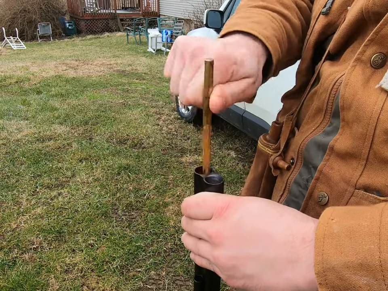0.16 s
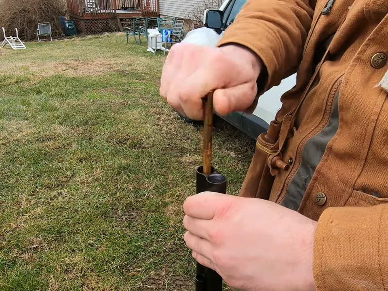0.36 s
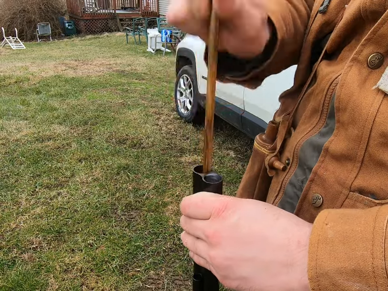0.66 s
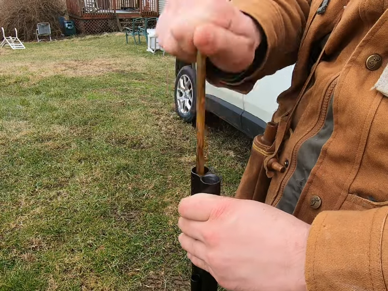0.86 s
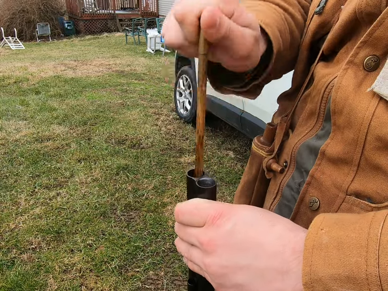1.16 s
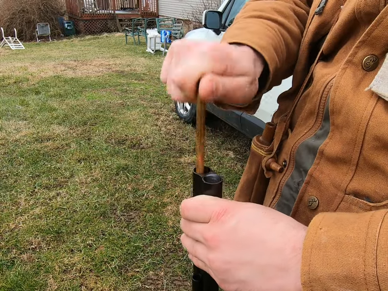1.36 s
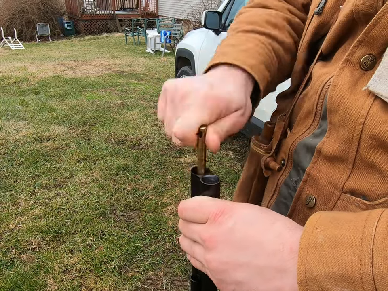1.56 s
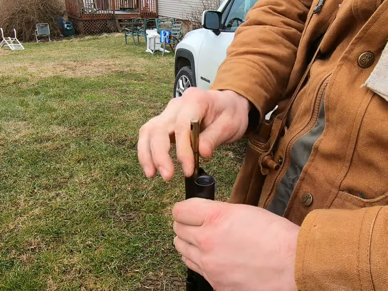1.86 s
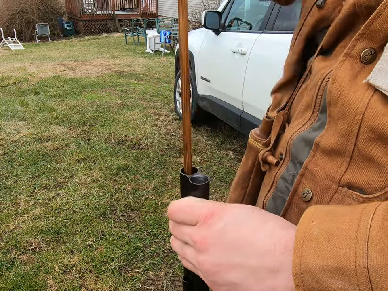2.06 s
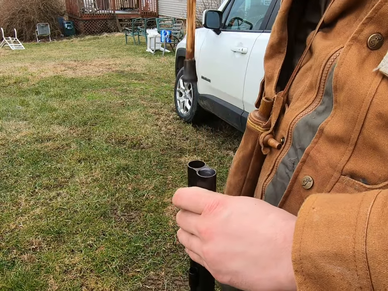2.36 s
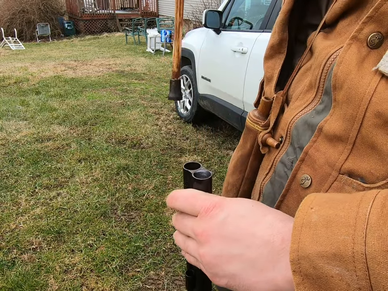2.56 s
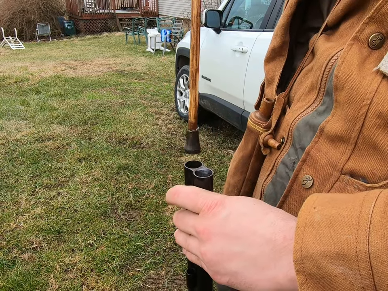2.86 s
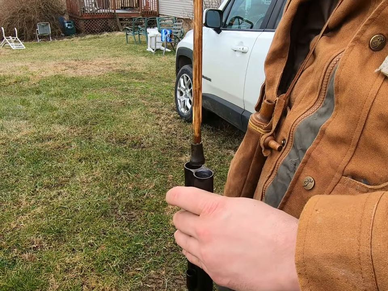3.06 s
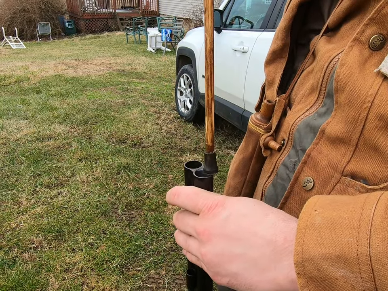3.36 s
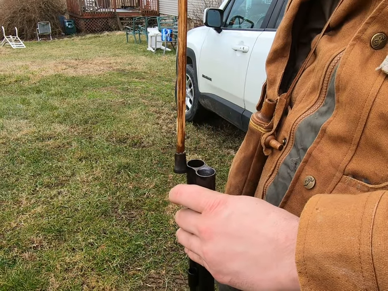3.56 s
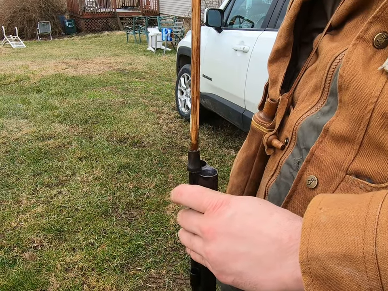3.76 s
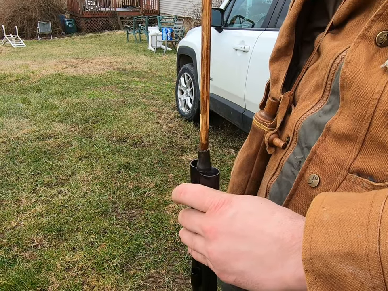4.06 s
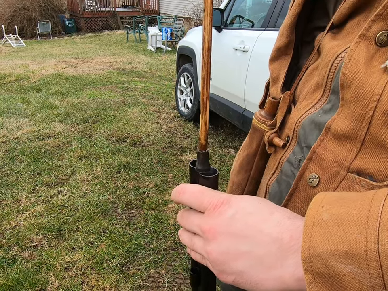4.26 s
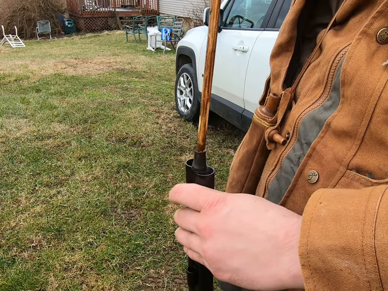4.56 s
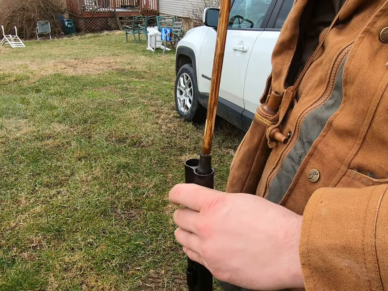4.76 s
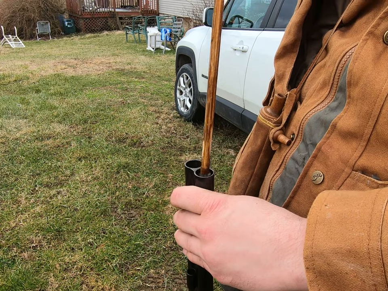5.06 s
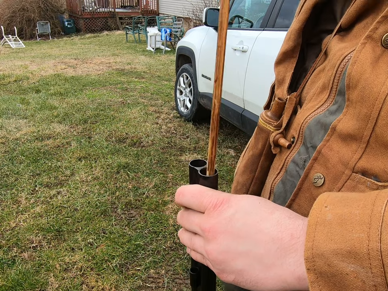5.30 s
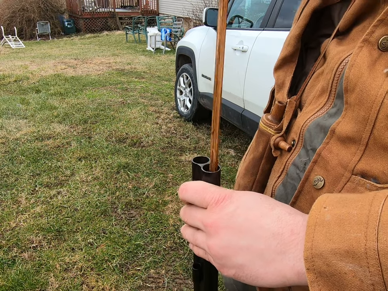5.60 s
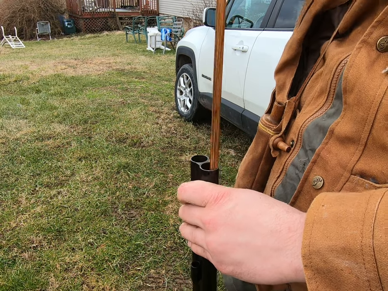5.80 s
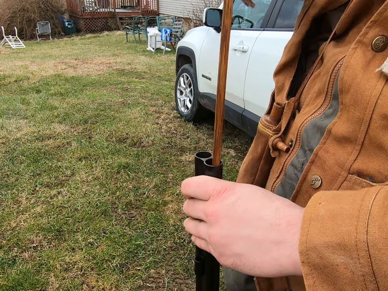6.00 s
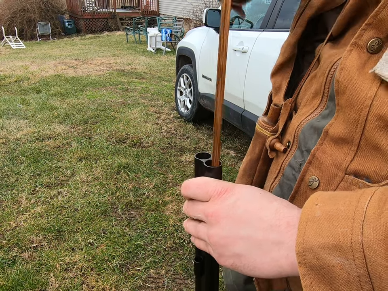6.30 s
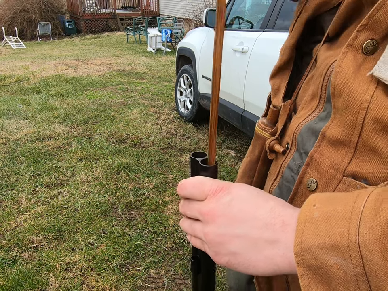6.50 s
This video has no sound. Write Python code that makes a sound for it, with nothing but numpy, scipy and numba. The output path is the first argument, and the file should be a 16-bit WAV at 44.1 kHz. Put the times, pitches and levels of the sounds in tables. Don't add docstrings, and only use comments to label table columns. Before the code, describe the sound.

Metal-tipped wooden rod cracks and clinks inside a steel gun barrel, is scraped out, taps the muzzle, then rasps up and down the second barrel.

```python
import sys
import numpy as np
from scipy import signal
from scipy.fft import rfft, irfft
from scipy.io import wavfile
from scipy.ndimage import uniform_filter1d
from numba import njit

SR = 44100
rng = np.random.default_rng(int(sys.argv[2]) if len(sys.argv) > 2 else 0)


def generate_wav(sig):
    pcm = np.round(np.clip(np.atleast_2d(sig).T, -1, 1) * 32767).astype(np.int16)
    wavfile.write(sys.argv[1], SR, pcm)


def field_ratio(decibels):
    return 10 ** (np.asarray(decibels, dtype=float) / 20)


N = 292824

# time in s, pipe pitch in Hz, scrape of the next stroke in dB, attack in s.
STROKES = [(5.469, 1382, -32.5, 0.014), (5.625, 371.5, -26, .005), (5.748, 772.4, -35, 0.011),
           (5.889, 270.9, -30, 0.035), (6.037, 469.5, -37.5, 0.015), (6.169, 237, -29, 0.02),
           (6.301, 570, -35.5, 0.025), (6.445, 217.2, -28.5, 0.03), (6.534, 372, -32, 0.00005),
           (6.581, 357.4, -31, 0.0155), (6.66, 373.5, -60, 0)]
# start in s, crack in dB, air push in dB,
# push length in ms, brittle treble in dB re crack.
RAMS = [(0.001, -26.5, -29.5, 4.76, -14.5), (0.093, -11, -18.5, 4.95, -24.5), (0.204, -28, -19, 4.95, -17),
        (0.386, -17, -37.5, 5.5, -22), (0.844, 5.5, -15, 2.3, -27), (0.8602, -20, -11.5, 4.36, -25),
        (0.922, -31, -26, 2.96, -17), (1.109, -2, -14, 5.1, -18.5), (1.188, -18, -28.5, 4.8, -10),
        (1.374, 7, -16, 5.2, -29.5), (1.447, -10.5, -31, 4.4, -20), (1.618, 1, -19.5, 2.7, -23.5),
        (5.523, -4.5, -50, 5.7, -17.5), (6.317, -8.5, -22, 3.17, -29), (6.515, -3, -61, 9.2, -18),
        (6.613, -2.5, -16.5, 4.66, -21)]
# start in s, peak in dB, tone in Hz.
SNAGS = [(5.191, -28, 5700), (5.207, -25, 4040), (5.214, -21, 3920), (5.22, -21, 3660),
         (5.225, -21.5, 3530), (5.273, -28, 3500), (5.631, -22, 2690), (5.6535, -2, 3020),
         (5.6595, -16, 3200), (5.673, -10.5, 3340), (5.686, -5, 3650), (5.6945, -8, 2600),
         (5.702, -18, 5400), (5.7059, -13.5, 2280), (5.761, -21, 3070), (5.767, -10, 3480),
         (5.794, -22, 4000), (5.806, -18, 3120), (5.826, -23, 3200), (5.843, -14.5, 2440),
         (5.918, -40, 3020), (5.929, -21, 2870), (5.957, -43, 2310), (5.969, -3.5, 2970),
         (5.986, -24, 2130), (6, -17.5, 2480), (6.083, -18, 2530), (6.205, -29, 3500), (6.231, -8, 2740),
         (6.238, -12, 2130), (6.243, -13.5, 2930), (6.268, -13, 3600), (6.315, -18.5, 2530),
         (6.477, -20, 3440), (6.488, -20, 3020), (6.506, -21.5, 3060)]
# time in s, level in dB.
DRAW = [
    (2.09, -52),
    (2.16, -52.5),
    (2.27, -40),
    (2.325, -41),
    (2.345, -59),
    (2.37, -50),
    (2.48, -58.5),
    (2.56, -83),
]
# peak time in s, level in dB, rise in dB per s, fall in dB per s.
RUSTLE = [(.015, -46.5, 98, 167), (.2, -59, 57, 48), (.085, -47.5, 247, 910), (.75, -58.5, 130, 30),
          (.84, -42.5, 348.5, 899.5), (1.104, -50, 102, 900), (1.33, -59.5, 150, 147),
          (1.371, -55, 499.5, 900), (.9, -46.5, 196, 44), (1.45, -61.5, 99.5, 35), (2.04, -66, 27, 900),
          (2.5, -71, 899.5, 23), (3.8, -87, 4, 13), (4.7, -76.5, 28.5, 16.5), (4.99, -55.5, 88, 698)]
# tone in Hz, level in dB, t60 in s.
STEEL = [(808, -8, 0.1413), (998, -2.5, 0.14), (1282, -3, 0.2), (1451, -2.5, 0.038), (2120, 7, 0.042),
         (2970, 0.5, 0.03), (3160, -10, 0.1), (3310, 2, 0.03), (4076, 7, 0.035), (5030, -17, 0.063),
         (5850, -13.5, 0.06), (5740, -0.5, 0.029), (6300, -26, 0.053), (6600, -13, 0.067),
         (7800, -5, 0.063), (7960, -17, 0.055)]


def amp_curve(table):
    s, db = np.transpose(table)
    return field_ratio(np.interp(np.arange(N) / SR, s, db, left=-200, right=-200))


def swells(rows, floor_db=-200):
    t = np.arange(N) / SR
    power = field_ratio(floor_db) ** 2
    for s, db, rise, fall in rows:
        power = power + field_ratio(db - np.maximum(rise * (s - t), fall * (t - s))) ** 2
    return np.sqrt(power)


def unit(x):
    return x / np.sqrt(np.mean(x ** 2))


def band(x, lo_hz, hi_hz):
    edges_hz = [lo_hz, min(hi_hz, .45 * SR)]
    return signal.sosfilt(signal.butter(2, edges_hz, "bandpass", fs=SR, output="sos"), x)


def colour(x, spectrum):
    hz, db = np.transpose(spectrum)
    size = 8192
    bin_hz = np.fft.rfftfreq(size, 1 / SR)
    cep = irfft(np.log(field_ratio(np.interp(np.log(bin_hz + 1), np.log(hz), db))))
    cep[1:size // 2] *= 2
    cep[size // 2 + 1:] = 0
    return signal.fftconvolve(x, irfft(np.exp(rfft(cep))))[:len(x)]


def flicker(rate_hz, depth_db):
    k = int(SR / rate_hz)
    steps = np.repeat(rng.standard_normal(N // k + 1), k)
    return field_ratio(depth_db * unit(uniform_filter1d(steps, k)[:N]))


def ring_down(t, t60):
    return np.exp(-np.log(1000) * t / t60)


def add(track, s, sound):
    i = int(s * SR)
    track[i:i + len(sound)] += sound[:N - i]


def rams():
    # frequency in Hz, level in dB per Hz.
    crack_spectrum = [(290, -42), (500, -1.5), (807, 4.5), (1820, 4.5), (4150, 3.5), (4870, -2),
                      (7210, -15.5), (12100, -35.5), (16000, -58.5)]
    cracks, brittle, pushes = np.zeros((3, N))
    t = np.arange(600) / SR
    for s, crack_db, push_db, push_ms, brittle_db in RAMS:
        splinter = rng.standard_normal((2, 600)) * np.exp(-t / 0.0014)
        add(cracks, s + .001, field_ratio(crack_db) * (.25 * splinter[0] + (t == 0)))
        add(brittle, s + .001, field_ratio(crack_db + brittle_db) * splinter[1])
        add(pushes, s, -field_ratio(push_db) * np.sin(np.pi * np.minimum(t * 1000 / push_ms, 1)) ** 2)
    cracks = field_ratio(-2) * band(colour(cracks, crack_spectrum), 230, 6800)
    brittle = field_ratio(5.5) * band(band(brittle, 5000, 9000), 4000, 11000)
    return cracks + brittle + band(pushes, 88, 5000)


@njit
def pipe(x, lag, gain, damp, treble):
    y, soft = np.zeros(len(x)), 0.
    for i in range(len(x)):
        at = i - lag[i]
        j = int(np.floor(at))
        back = y[j] + (at - j) * (y[j + 1] - y[j]) if j >= 0 else 0.
        soft += damp[i] * (back - soft)
        y[i] = x[i] - gain[i] * (treble[i] * back + (1 - treble[i]) * soft)
    return y


def bore(x):
    # start in s, pipe pitch in Hz, sag in Hz per s.
    seated = [
        (0, 125.4, 87),
        (.09, 137.3, 122),
        (.2, 127, 107),
        (.38, 133.4, 33.5),
        (.84, 127.9, 21),
        (1.1, 128.1, -7.5),
        (1.372, 128.9, 48),
        (1.617, 127.2, -10.5),
    ]
    # time in s, pipe pitch in Hz.
    travel = [
        (2.05, 131),
        (2.201, 187),
        (2.301, 460),
        (2.362, 1570),
        (5.168, 4884),
        (5.222, 3080),
        (5.251, 1690),
        (5.28, 860),
        (5.32, 760),
    ]
    loss_db, damp_hz = np.array([-1, -0.65]), np.array([1100, 2090])
    treble_share = np.array((0.34, 0.6))
    t = np.arange(N) / SR

    row = np.searchsorted(np.transpose(seated)[0], t, side="right") - 1
    s, hz, sag = np.transpose(seated)[:, row]
    seated_s = 1 / (hz - sag * np.minimum(t - s, .5))

    travel_at, travel_hz = np.transpose(travel)
    travel_s = np.interp(t, travel_at, 1 / travel_hz)

    turns, turn_hz = np.transpose(STROKES)[:2]
    count = np.arange(len(turns))
    stroke = np.interp(t, turns, count)
    eased = np.floor(stroke) + np.sin(np.pi / 2 * (stroke % 1)) ** 2
    swung_s = np.interp(eased, count, 1 / turn_hz)

    moving_s = np.where(t < turns[0], travel_s, np.maximum(travel_s, swung_s))
    period_s = np.where(t < travel_at[0], seated_s, moving_s)
    barrel = (t > 4).astype(int)
    damp = 1 - np.exp(-2 * np.pi * damp_hz[barrel] / SR)
    treble = treble_share[barrel]
    trip = uniform_filter1d(SR / 2 * period_s, size=300)
    lag = np.maximum(trip - (1 - treble) * (1 - damp) / damp, 2.)
    return pipe(x + 1e-18, lag, field_ratio(loss_db)[barrel], damp, treble)


def clicks():
    # start in s, peak in dB, tone in Hz.
    blows = [(.092, -13, 2010), (0.0944, -9.5, 3560), (.386, -14.5, 3860), (.8445, -4, 3560),
             (0.858, -20, 2500), (.8583, -15.5, 1660), (1.1084, -10.5, 2840), (1.1099, -2.5, 2740),
             (1.3735, -8.5, 2440), (1.376, -8, 3460), (1.619, -15, 1850), (1.619, -7, 3630),
             (1.619, -7, 6400), (1.6204, -10, 6230), (5.523, -3.5, 2700), (6.519, -10, 1340),
             (6.614, -7.5, 1930), (0.924, -33.5, 900)]
    cycles = 2.13
    out, t = np.zeros(N), np.arange(600) / SR
    for s, peak_db, hz in blows + SNAGS:
        window = np.sin(np.pi * np.minimum(t * hz / cycles, 1)) ** 2
        add(out, s, field_ratio(peak_db + 0.5) * window * np.sin(2 * np.pi * hz * t))
    return out


def stroking():
    turn_db, snag_swell_db, snag_swell_s = -55.5, 5.5, 0.023
    rows, t = [], np.arange(N) / SR
    for (start, hz, db, attack_s), (end, next_hz, *_) in zip(STROKES, STROKES[1:]):
        release_s, swell_db = (0.037, -4.5) if next_hz < hz else (0.028, 2.9)
        room = min(1, .9 * (end - start) / (attack_s + release_s))
        rows += [(start, turn_db),
                 (start + room * attack_s, db - swell_db / 2),
                 (end - room * release_s, db + swell_db / 2),
                 (end - 1 / SR, turn_db)]
    flare = sum((t > s) * np.exp(-np.abs(t - s) / snag_swell_s) for s, *_ in SNAGS)
    return amp_curve(rows) * field_ratio(snag_swell_db * (np.minimum(flare, 1) - .5))


def rubbing():
    # time in s, level in dB.
    entry = [
        (5.13, -85),
        (5.18, -36.5),
        (5.215, -32.5),
        (5.24, -37.5),
        (5.272, -36),
        (5.335, -69.5),
        (5.355, -69.5),
        (5.46, -69),
    ]
    # frequency in Hz, level in dB per Hz.
    grit_spectrum = [(400, -25.5), (800, -22), (1200, -6.5), (1800, -5), (3300, -0.5), (5000, -4),
                     (7500, -7.5), (8500, -25), (14000, -57.5)]
    # time in s, tone in Hz.
    rim_pitch = [
        (5.16, 4700),
        (5.2, 4300),
        (5.225, 3500),
        (5.245, 3300),
        (5.25, 4600),
        (5.275, 3500),
        (5.33, 2600),
    ]
    entry_gain = amp_curve(entry)
    force = np.maximum(amp_curve(DRAW) + entry_gain, stroking())
    t = np.arange(N) / SR
    roughness = np.where(t > 3, 1, np.where(t > DRAW[5][0], .3, 1.5))
    grains = (flicker(900, 3) * flicker(120, 2.5)) ** roughness

    def grainy():
        return rng.standard_normal(N) * grains

    grit_out, grit_in = [unit(colour(grainy(), grit_spectrum)) * force for _ in range(2)]
    hiss = unit(band(grainy(), 4500, 9840)) * force ** 0.6 * field_ratio(-28)
    drumming = unit(band(grainy(), 390, 1740)) * force * (t < 3) * field_ratio(-13)

    nap = flicker(300, 3) * flicker(40, 4)
    cloth = np.zeros(N)
    for hz, share in ((1100, 0.26), (2100, 0.42), (3300, 0.63), (5500, 0.32)):
        strip = band(band(rng.standard_normal(N) * nap, hz / 1.3, hz * 1.3), hz / 2, hz * 2)
        cloth += share * unit(strip) * flicker(30, 3.6)
    cloth *= swells(RUSTLE)

    squeal = np.sin(2 * np.pi * np.cumsum(np.interp(t, *np.transpose(rim_pitch))) / SR)
    squeal *= unit(band(grainy(), 52, 420))
    rim = band(grit_out, 3100, 5050) * field_ratio(-5) + squeal * entry_gain * field_ratio(7)
    return rim + grit_out * field_ratio(-11) + hiss + drumming + cloth, grit_in * field_ratio(-3)


def hum():
    return unit(band(rng.standard_normal(N), 130, 616)) * stroking() ** 0.47 * field_ratio(-39.5)


def knock(wood_hz, tick_db, steel_db, modes):
    t = np.arange(5000) / SR
    chance = rng.standard_normal((2, len(modes), 1))
    hz, db, t60 = np.transpose(modes)[:, :, None]
    gain = field_ratio(.5 * db + 2.5 * chance[0] - 8 * np.abs(np.log2(hz / wood_hz)))
    decay = ring_down(t, np.minimum(t60, 0.079 * np.sqrt(1500 / hz)))
    tones = gain * decay * np.sin(2 * np.pi * hz * (1 + 0.0038 * chance[1]) * t)
    spot = .8 * gain.max() * ring_down(t, 0.019) * np.sin(2 * np.pi * wood_hz * t)
    tones = (tones.sum(axis=0) + spot) * (1 - np.exp(-t / 0.00021))

    rattle = rng.standard_normal((2, 5000)) * (1 - np.exp(-t / 0.0027))
    wood = rattle[0] * (np.exp(-t / 0.0026) + 0.05 * np.exp(-t / 0.011))
    wood = band(band(wood, wood_hz / 2.41, wood_hz * 2.2), wood_hz / 12, wood_hz * 1.7)
    tick = band(rattle[1] * (np.exp(-t / 0.0054) + .05 * np.exp(-t / .012)), 4600, 10000)
    parts = (wood, -6.5), (tick, tick_db + 3), (tones, steel_db)
    return sum(field_ratio(part_db) * part / np.abs(part).max() for part, part_db in parts)


def knocks():
    # start in s, peak in dB, wood (or fitting) tone in Hz.
    lifts = [(.123, -35, 965), (.253, -33.5, 3250), (.278, -44, 2070), (.327, -51, 3030),
             (.373, -28.5, 3620), (.533, -39, 3730), (.543, -39, 1160), (.671, -39, 3250),
             (.708, -41.5, 2580), (.728, -26, 3010), (1.037, -16, 4414), (1.046, -24, 3816),
             (1.054, -23, 5560), (1.129, -34.5, 2296), (1.284, -23, 3480)]
    rattles = [(.175, -23, 2000), (.195, -36, 1590), (.228, -56, 850), (.395, -28.5, 3320),
               (.422, -34.5, 3800), (.874, -20, 2840), (.885, -18, 4200), (.936, -26.5, 3180),
               (.993, -37.5, 4060), (1.156, -25, 3800), (1.187, -20, 3150), (1.248, -34, 2550),
               (1.289, -33, 2180), (1.378, -23, 1770), (1.407, -21, 3500), (1.445, -25.5, 2800),
               (1.483, -31.5, 3080), (1.525, -22, 4964), (1.47, -38.5, 2500), (1.195, -26.5, 2215),
               (1.08, -33.5, 3400), (1.327, -47, 2450), (.052, -51, 2030), (.825, -29, 3330),
               (1.645, -27, 2952), (5.631, -21, 3000), (6.334, -18, 3252), (6.355, -18, 2720),
               (6.549, -21.5, 3030), (6.597, -36, 2150)]
    grips = [(1.697, -38, 7800), (1.72, -43.5, 2140), (1.787, -29.5, 3560), (1.83, -39, 3500),
             (1.856, -42, 3560), (1.904, -33, 2660), (1.946, -30, 2560), (2.008, -39, 2830),
             (2.055, -37.5, 3130), (2.066, -34.5, 2560), (2.087, -19.5, 3480), (2.119, -41, 2930),
             (2.199, -34, 4000), (2.219, -29, 4260), (2.254, -30, 3200), (2.325, -52, 3400),
             (2.279, -23, 5400), (2.355, -22, 2670)]
    taps = [
        (3.671, -19.5, 2120),
        (3.85, -37, 2080),
        (4.803, -33, 1650),
        (4.919, -24, 2130),
        (4.949, -45, 1090),
    ]
    nudges = [
        (3.378, -33, 2820),
        (3.97, -46, 2658),
        (4.061, -55, 3440),
        (4.785, -39.5, 2377),
        (4.883, -33.5, 2730),
        (5.409, -43, 3030),
        (5.437, -18.5, 4230),
    ]
    chinks = [
        (.856, -14, 9000),
        (.874, -24.5, 8500),
        (.884, -26.5, 10000),
        (1.1165, -25, 10000),
        (1.155, -33.5, 8700),
        (1.3805, -20.5, 9500),
        (1.407, -21, 8500),
        (1.646, -29, 8700),
    ]
    # tone in Hz, level in dB, t60 in s.
    muzzle = [(821, -8, 0.12), (1025, -3.5, 0.13), (1450, -11.5, 0.11), (2130, -19, .09), (2800, 6, 0.013),
              (3077, 4, .08), (4060, 27.5, 0.017), (5650, -2.5, .05), (7100, -7, .04)]
    fittings = [(7600, -9, 0.02), (8630, 0, .04), (8560, -4, .035), (9700, -6, .04), (10260, 2.5, .035),
                (11300, -6, .04), (12200, -15, .03)]
    # contacts, tick in dB, ring in dB, modes.
    kinds = [(lifts, -24.5, -2.5, STEEL), (rattles, -14.5, -2.7, STEEL), (grips, -13, -4.5, STEEL),
             (taps, -22.5, -0.44, muzzle), (nudges, -27.5, -6, muzzle), (chinks, -30, -2.5, fittings)]
    out = np.zeros(N)
    for rows, tick_db, steel_db, modes in kinds:
        for s, peak_db, wood_hz in rows:
            add(out, s, field_ratio(peak_db) * knock(wood_hz, tick_db, steel_db, modes))
    return out


def singing():
    t, now = np.arange(4000) / SR, np.arange(N) / SR
    hz, db, t60 = np.transpose(STEEL)[:, :, None]
    ring = (field_ratio(.5 * db) * ring_down(t, t60) * np.sin(2 * np.pi * hz * t)).sum(axis=0)
    tones = unit(signal.fftconvolve(rng.standard_normal(N) * flicker(150, 4), ring)[:N])
    draw = amp_curve(DRAW)
    slide = np.sin(np.pi * np.clip((now - 3.765) / 0.096, 0, 1)) * field_ratio(-62)
    held = tones * (draw * field_ratio(-7) + swells(RUSTLE) * field_ratio(-9.5))
    slid = (band(tones, 2000, 2200) + .6 * band(tones, 2950, 3200)) * slide
    return held + slid + band(tones, 1010, 1180) * draw * field_ratio(-9)


def jolts():
    # start in s, peak in dB, tone in Hz, t60 in s.
    butt = [
        (5.522, -34, 169, 0.05),
        (6.284, -30.5, 163, 0.066),
        (6.531, -22.5, 115.4, 0.096),
    ]
    out, t = np.zeros(N), np.arange(9000) / SR
    for s, _, push_db, *_ in RAMS:
        thud = band(rng.standard_normal(9000) * np.exp(-t / 0.013), 160, 650)
        add(out, s, 4 * field_ratio(push_db - 16) * thud)
    for s, peak_db, hz, t60 in butt:
        phase = 2 * np.pi * hz * t * (1 + 1.64 * np.exp(-t / 0.0043))
        add(out, s, field_ratio(peak_db + 4) * np.sin(phase) * ring_down(t, t60))
    return out


def yard():
    # frequency in Hz, level in dB per Hz.
    yard_spectrum = [(24, -33), (41, -16.5), (57, -3), (125, -30.5), (184, -6), (246, -29.5), (399, -30.5),
                     (573, -33.5), (748, -25.5), (1080, -34), (1270, -33.5), (1830, -39.5), (4480, -44.5),
                     (8600, -41.5), (10500, -69)]
    # peak time in s, level in dB, rise in dB per s, fall in dB per s.
    cars = [
        (1.7, -53.5, 14, 77),
        (2.5, -60.5, 9.7, 44),
        (3.3, -58, 27.8, 19),
        (5.1, -60.5, 24, 59),
        (6.64, -51, 21.6, 10),
    ]
    gusts = [
        (3.55, -58, 62.1, 72),
        (4.38, -51, 340, 150),
        (4.82, -58.5, 299, 148),
        (5.03, -50, 200, 150.6),
        (5.11, -40.5, 252, 201),
        (5.24, -45, 201, 158.6),
    ]
    # start in s, end in s, from Hz, to Hz, level in dB.
    bird = [
        (.47, 0.565, 7450, 7800, -71),
        (0.634, 0.702, 6600, 7600, -62.5),
        (3.497, 3.62, 7750, 7800, -72.5),
        (4.6, 4.781, 7600, 7650, -68.5),
    ]
    t, sides = np.arange(N) / SR, np.array([[1], [-1]])
    mid, side = (colour(rng.standard_normal(N), yard_spectrum) for _ in range(2))
    scale = field_ratio(-70) / np.sqrt(np.mean(band(mid, 400, 16000) ** 2))
    apart = 0.67 * band(side, 250, 16000) + .6 * band(side, 350, 1800)
    out = scale * (0.68 * mid * flicker(1.5, 0.45) + sides * apart)

    road = unit(band(band(rng.standard_normal(N), 140, 240), 89, 630))
    road *= swells(cars, -84.5) * flicker(14, 1)

    shared, left, right = (unit(band(band(rng.standard_normal(N), 18, 75), 15, 100)) for _ in range(3))
    wind = (.7 * shared + np.array([.3 * left, .8 * right])) * flicker(17, 3)

    for start, end, from_hz, to_hz, db in bird:
        part = np.clip((t - start) / (end - start), 0, 1)
        warble_hz = (from_hz + (to_hz - from_hz) * part) * flicker(300, .1)
        out[1] += field_ratio(db) * np.sin(np.pi * part) * np.sin(2 * np.pi * np.cumsum(warble_hz) / SR)
    return out + road + wind * swells(gusts, -79.5)


def scene():
    # frequency in Hz, level in dB.
    ports = [(200, -42), (700, -10.5), (1300, -11.5), (2400, -10.5), (4200, -20.5), (6000, -8.5),
             (8500, 0.5), (12000, -4), (16000, -1)]
    clinks, tip, (outside, inside) = knocks(), clicks(), rubbing()
    in_bore = np.where(np.arange(N) < 4 * SR, 1, .65)
    driven = rams() + in_bore * tip + inside + hum() + 0.024 * band(clinks, 300, 7700)
    near = (1 - in_bore) * tip + bore(driven) + clinks + outside + jolts()

    t = np.arange(4000) / SR
    fade = np.exp(-t / np.array([[.012], [.009]])) + 0.06 * np.exp(-t / 0.047)
    echo, spread = (unit(x) / np.sqrt(len(t)) for x in rng.standard_normal((2, 4000)) * fade)
    mid = near + field_ratio(-15.5) * signal.fftconvolve(band(near, 690, 8500), echo)[:N]
    side = colour(signal.fftconvolve(near, spread)[:N], ports)
    return mid + np.array([[1], [-1]]) * (side + 0.02 * mid) + yard() + singing()


def band_limit(x):
    return signal.sosfilt(signal.butter(12, 16170, fs=SR, output="sos"), x)


def record(dry):
    heard = signal.sosfilt(signal.butter(1, 20, "highpass", fs=SR, output="sos"), dry)
    heard = 0.83 * np.tanh(heard / 0.89)
    heard = signal.sosfilt(signal.ellip(8, .2, 60, 15500, fs=SR, output="sos"), heard)
    return band_limit(heard)


dry = scene()
out = record(dry)
generate_wav(out)
```